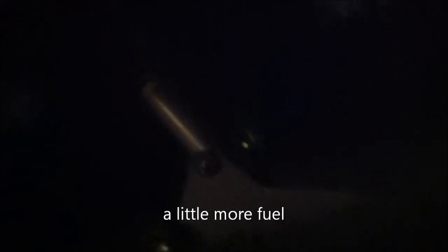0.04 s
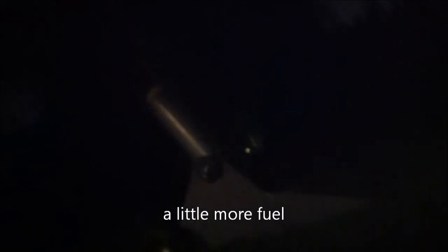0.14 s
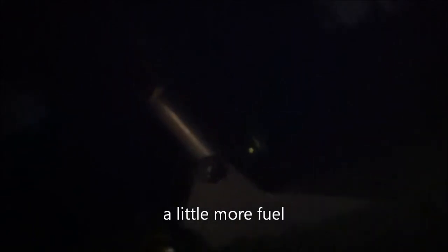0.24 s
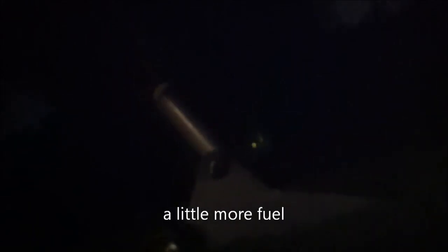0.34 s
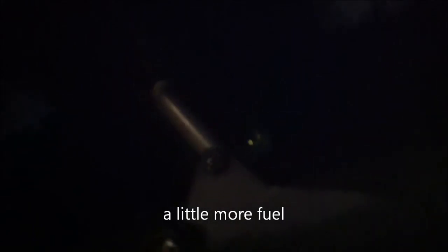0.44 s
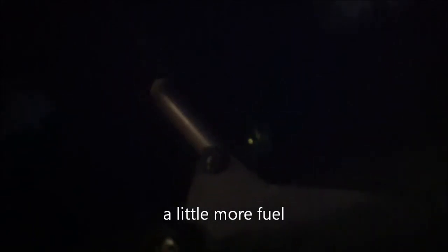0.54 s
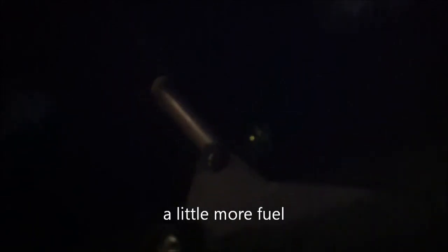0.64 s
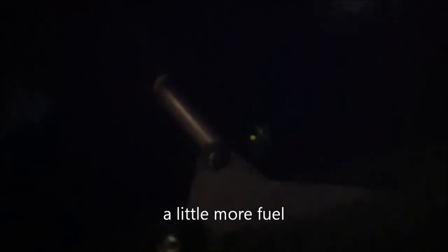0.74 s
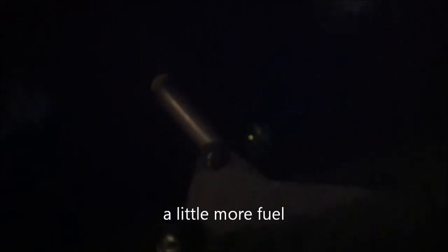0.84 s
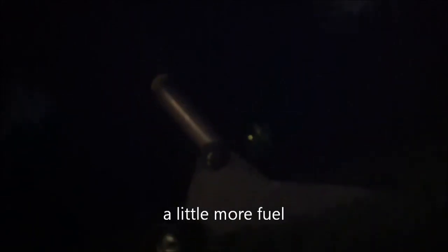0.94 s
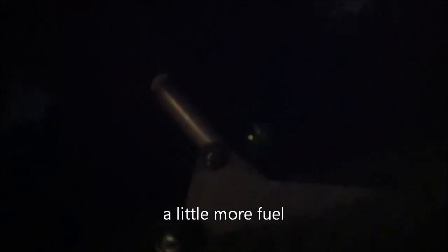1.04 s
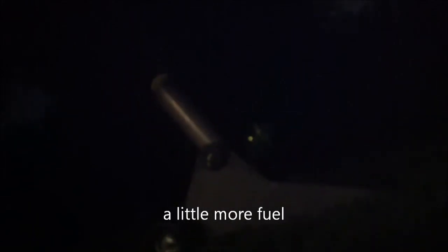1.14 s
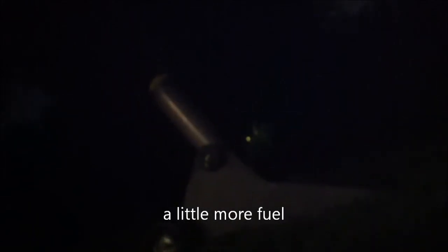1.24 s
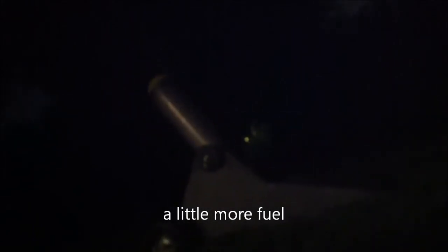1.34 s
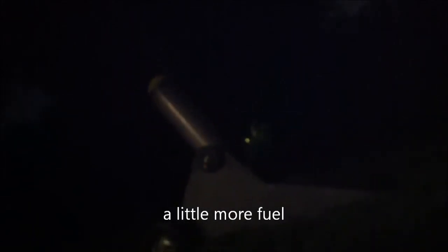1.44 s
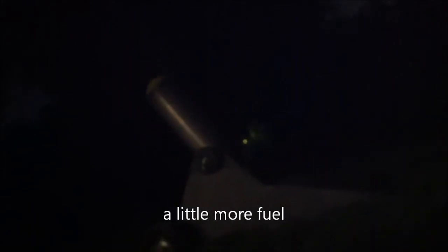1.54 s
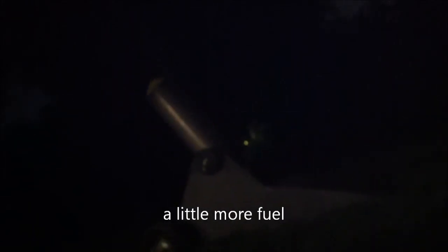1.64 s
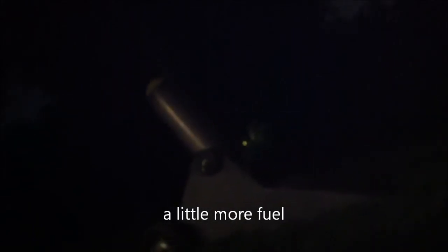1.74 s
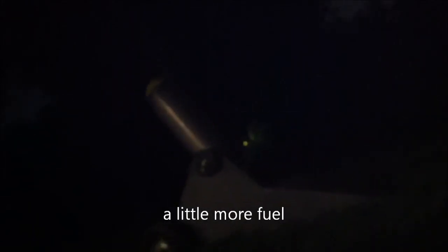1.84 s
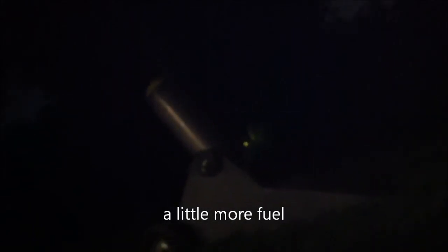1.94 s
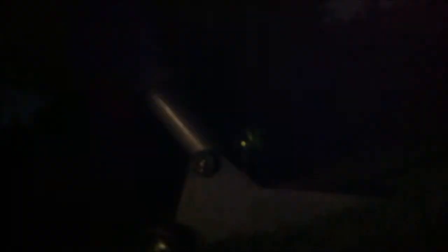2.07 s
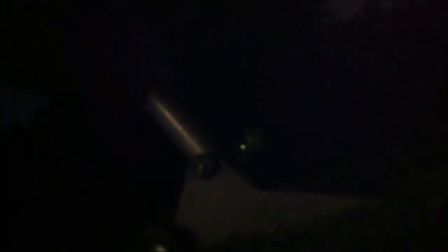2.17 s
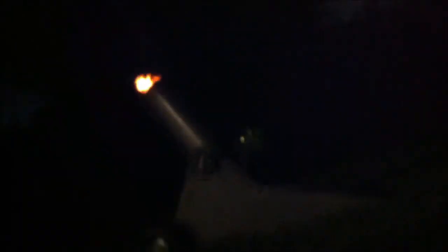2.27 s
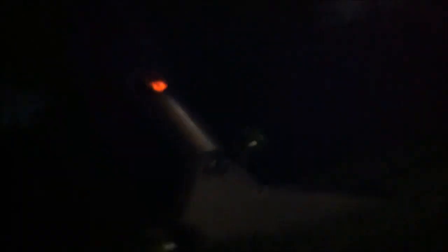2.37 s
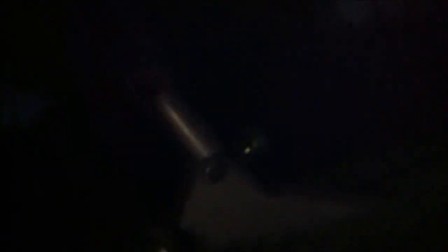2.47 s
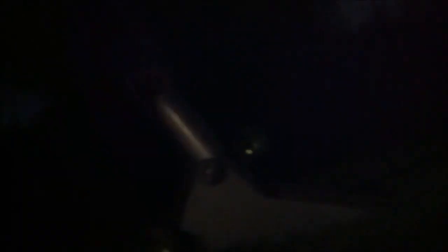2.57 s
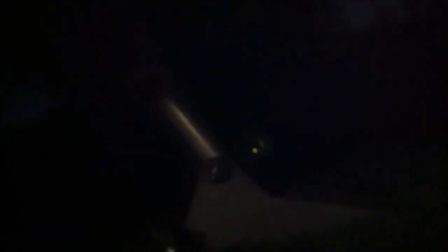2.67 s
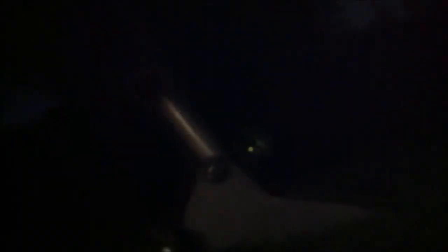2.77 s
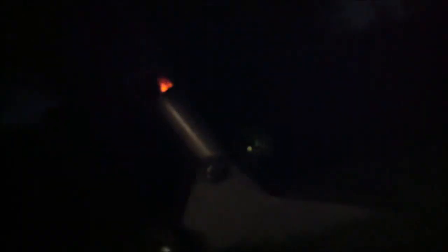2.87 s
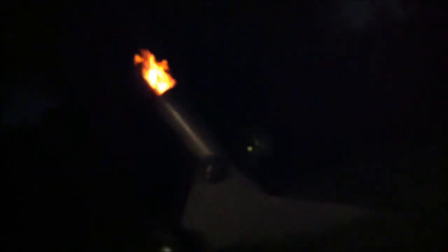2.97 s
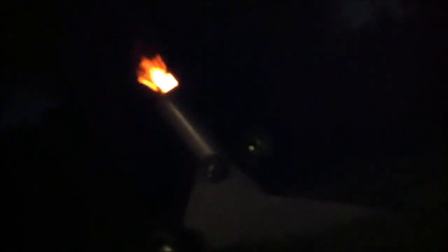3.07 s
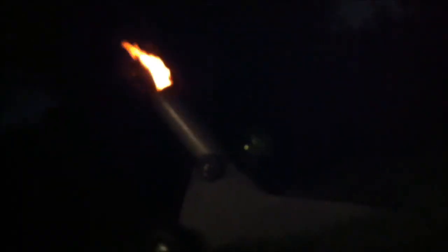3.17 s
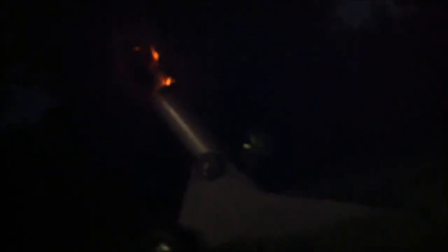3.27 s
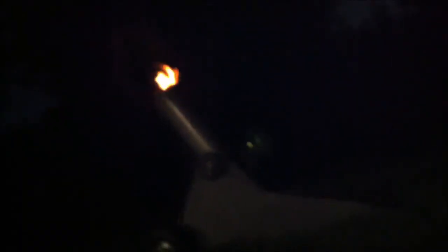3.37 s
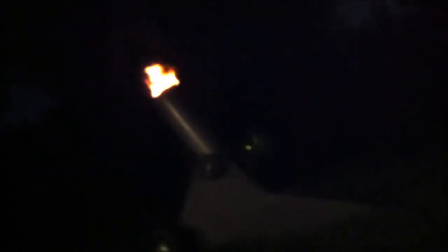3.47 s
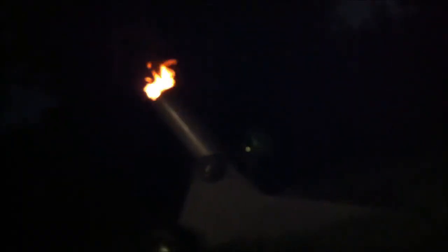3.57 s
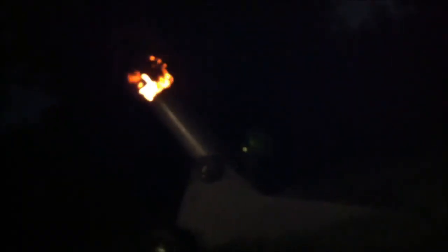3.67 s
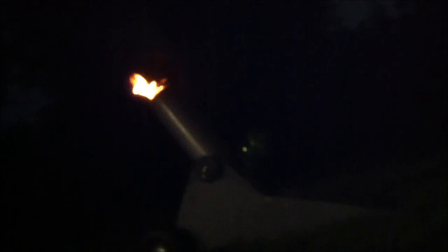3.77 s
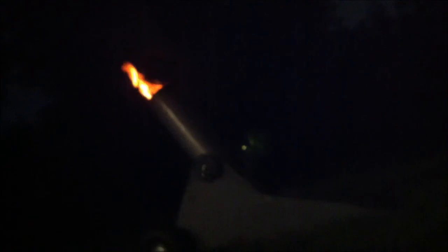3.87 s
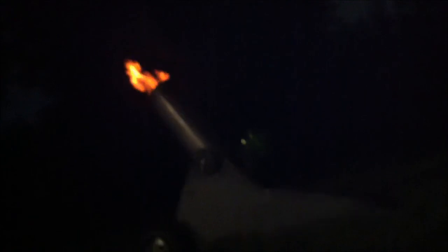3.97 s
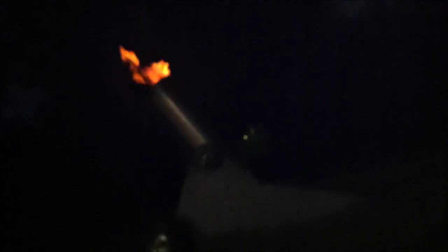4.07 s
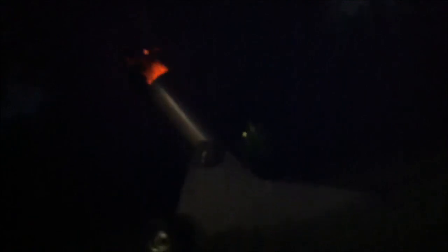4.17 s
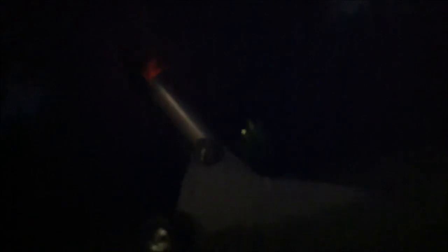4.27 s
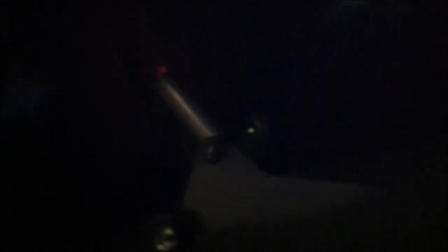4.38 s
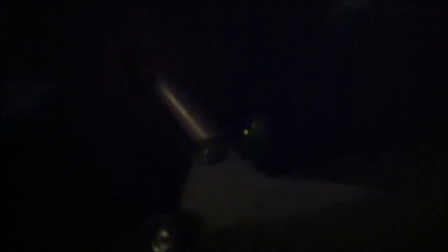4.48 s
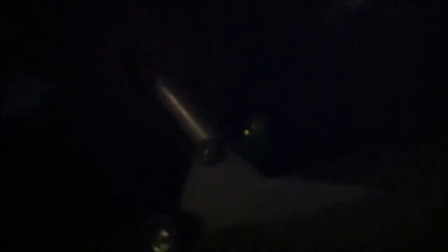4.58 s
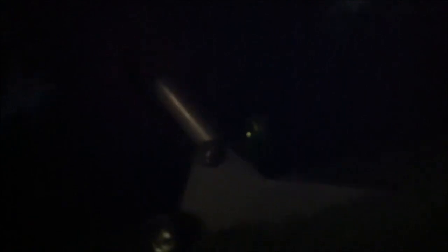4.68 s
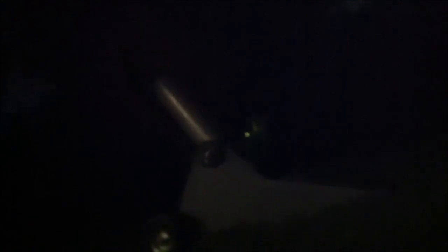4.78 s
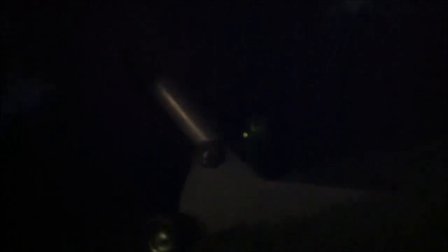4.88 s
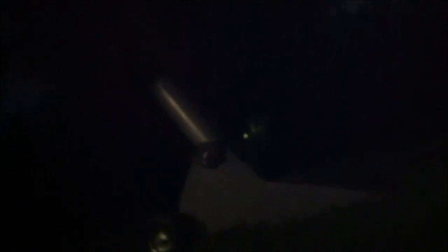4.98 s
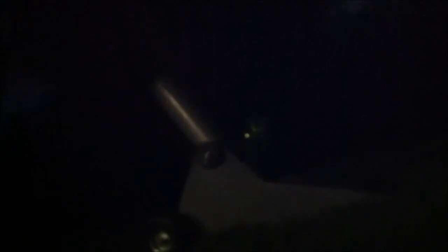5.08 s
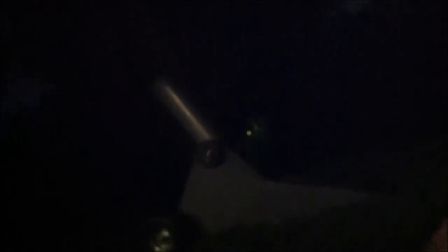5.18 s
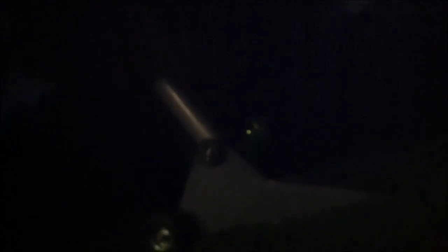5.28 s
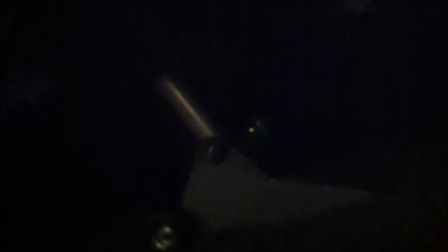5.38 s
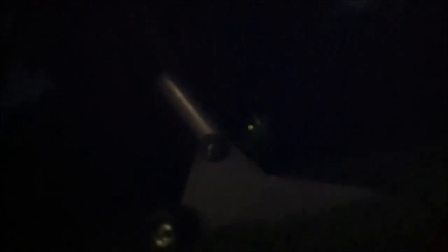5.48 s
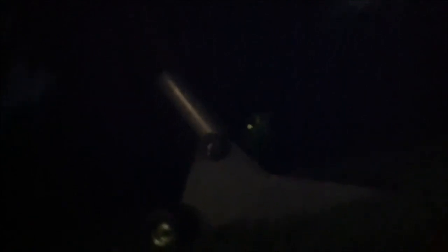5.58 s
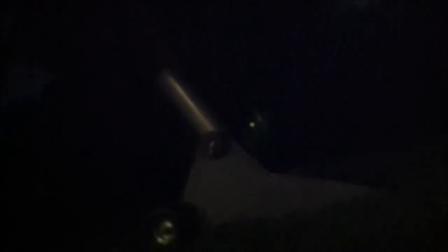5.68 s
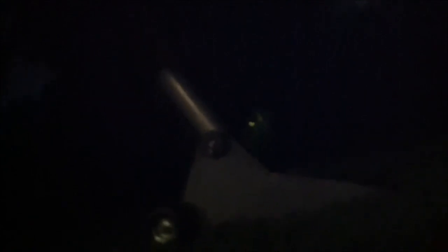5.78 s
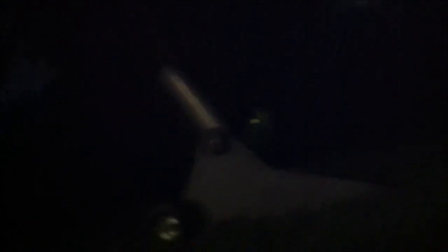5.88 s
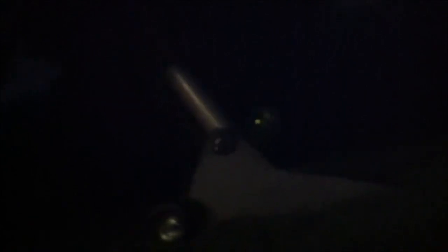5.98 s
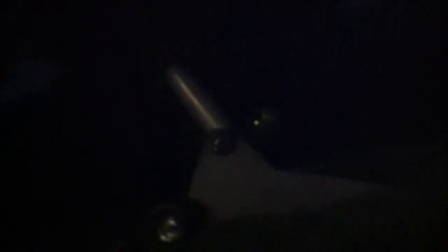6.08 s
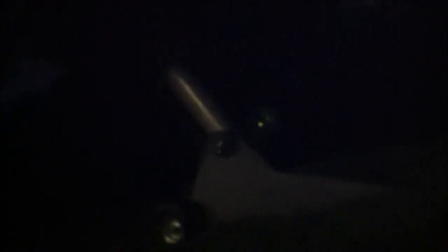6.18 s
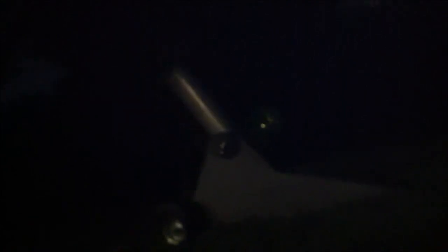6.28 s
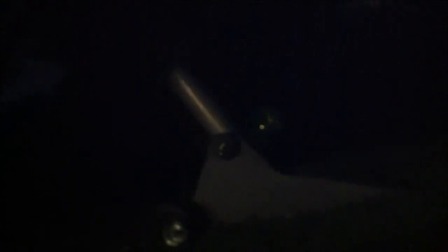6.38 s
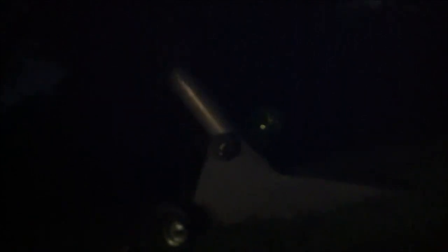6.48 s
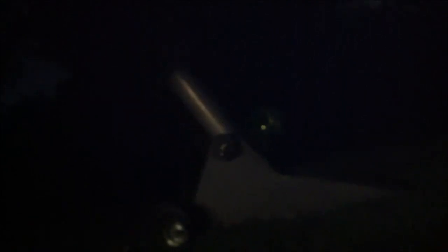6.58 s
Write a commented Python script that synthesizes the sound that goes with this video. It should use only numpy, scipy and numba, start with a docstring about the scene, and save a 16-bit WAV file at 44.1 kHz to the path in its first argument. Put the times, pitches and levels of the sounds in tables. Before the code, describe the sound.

A homemade gas cannon fires outdoors at night: igniter click, one overloaded boom, rolling echoes off trees, then insects slowly creep back.

```python
"""A snap, then a boom: a homemade gas cannon fires on a lawn at night. The igniter is a noise burst, the barrel a set
of decaying modes, the shock fronts filtered clicks; trees and houses return echo clicks and decaying noise.
Left-over gas burns softly at the muzzle and faint ticks and rustles follow, as flickering noise bands. Insects, noise
cut into wing strokes, shrill over a low distant hum. The camera's gain control ducks under the blast and lets the
night back in over several seconds."""
import sys
import numpy as np
from scipy import signal
from scipy.fft import rfft, irfft, next_fast_len
from scipy.io import wavfile
from numba import njit

SR = 44100
rng = np.random.default_rng(int(sys.argv[2]) if len(sys.argv) > 2 else 0)


def persist_wave(psi):
    """Save psi, clipped to +-1, as 16-bit WAV."""
    counts = np.round(np.clip(psi, -1, 1) * 32767).astype(np.int16)
    wavfile.write(sys.argv[1], SR, np.atleast_2d(counts).T)


N = 291940
TIME = np.arange(N) / SR
SPARK_S, BLAST_S = 2.0939, 2.1122


def blast(ring_peak_db=22, shock_db=15):
    """Pressure swells exponentially, then levels off, rings the barrel's air and throws out shock fronts."""
    # Air modes of the barrel. Each row: frequency in Hz, level in dB, t60 in seconds.
    barrel_modes = [(124, -18, 0.33), (177, -9, 0.18), (303, -3, 0.21), (360, -8, 0.23), (540, -19, .18),
                    (664, -16, 0.15), (844, -19, .13)]
    # Shock fronts leaving the muzzle. Each row: time in seconds, level in dB, treble edge in Hz.
    shock_fronts = [(2.1122, -21, 6970), (2.1139, -14.5, 10040), (2.1179, -11, 3500), (2.1266, -6.5, 3000),
                    (2.1467, 2.5, 2800)]
    # Colour of a shock front. Each row: frequency in Hz, level in dB.
    shock_outline = [(30, -33.5), (250, 0), (800, -1.5), (1800, -8.5), (4000, -24), (8000, -37.5),
                     (16000, -45.5)]
    swell_s, half_pressure_s = .0029, .0125
    age_s = TIME - BLAST_S
    pressure = .5 + .5 * np.tanh((age_s - half_pressure_s) / (2 * swell_s))
    modes = 0
    for hz, db, t60_s in barrel_modes:
        tone = np.cos(2 * np.pi * hz * (age_s - half_pressure_s))
        modes = modes + undb(db) * fade(SPARK_S, t60_s) * tone
    ring = pressure * modes
    ring = undb(ring_peak_db) * ring / np.abs(ring).max()
    fronts = sum(dull(clicks([(s, db)]), edge_hz) for s, db, edge_hz in shock_fronts)
    return ring + undb(shock_db) * colour(fronts, shock_outline)


def spark(crack_db=-12.0, crack_s=0.0014, ring_db=-25, ring_t60_s=.02):
    """The igniter: a millisecond of discharge and a short ring, both coloured noise."""
    # Colour of the snap. Each row: frequency in Hz, level in dB.
    snap_outline = [(300, -32), (1360, -12.5), (2400, -21), (3100, -2), (3900, -2.5), (5800, -20),
                    (7570, -6), (10000, -5.5), (12700, -6.5), (14000, 5), (16000, -11.5)]
    discharge = (TIME >= SPARK_S) * (TIME < SPARK_S + crack_s)
    envelope = undb(crack_db) * discharge + undb(ring_db) * fade(SPARK_S, ring_t60_s)
    return level(colour(noise(), snap_outline), 0) * envelope


def surroundings(echo_db=20, lumpy_db=1.5, rumble_db=5.6, foliage_db=6.5):
    """Big surfaces return thuds and a dull roll; foliage scatters a brighter roar that dies with path length."""
    # Echoes from houses and tree lines. Each row: time in seconds, level in dB relative to the roll then.
    distinct_echoes = [(2.147, -6), (2.216, -2), (2.243, -0.5), (2.316, 0), (2.403, -3.5), (2.456, -6),
                       (2.541, -1), (2.739, -4.5), (3.51, 3)]
    # Colour of the echoes. Each row: frequency in Hz, level in dB.
    echo_outline = [(25, -39), (50, -35), (80, -18.5), (125, -4), (160, 2), (210, 1), (260, -8.5),
                    (320, -7), (500, -24), (1000, -45.5), (4000, -71.5)]
    # Colour of the roar scattered by foliage. Each row: frequency in Hz, level in dB.
    scatter_outline = [(100, -23.5), (220, -6.5), (305, 5), (420, -3.5), (650, -8.5), (1000, -21.5),
                       (1900, -22.5), (2600, -30.5), (4200, -35.5), (5000, -41), (9000, -46.5),
                       (16000, -50)]
    strength = roll()
    returns = (clicks(distinct_echoes) + small_echoes()) * strength
    thuds = undb(echo_db) * colour(returns, echo_outline)
    rumble = level(colour(noise(), echo_outline), rumble_db)
    roar = air(level(colour(noise(), scatter_outline), foliage_db))
    uneven = strength * undb(lumpy_db * walk(70))
    return dull(thuds + rumble * uneven, 1500) + roar * uneven


def roll(attack_s=.014, hold_s=0.21, db_per_doubling=22.5, order=4):
    """Returning strength: quick rise, hold across the nearby trees, then a fixed loss per doubled travel time."""
    age_s = np.maximum(TIME - BLAST_S, 0)
    rise = np.minimum(age_s / attack_s, 1) ** 2
    # order sets how sharply the hold bends into the loss
    doublings = np.log2(1 + (age_s / hold_s) ** order) / order
    return rise * undb(-db_per_doubling * doublings)


def small_echoes(first_s=.13, last_s=.8, db=-11, scatter_db=2, count=20):
    """Lesser surfaces at random distances, one in each equal step of delay."""
    place, size = rng.random((count, 2)).T
    delay_s = first_s + (last_s - first_s) * (np.arange(count) + place) / count
    echo_db = db + scatter_db * (2 * size - 1)
    return clicks(np.column_stack([BLAST_S + delay_s, echo_db]))


def air(x, db_per_s=29, db_per_s_per_khz=2.7, size=512):
    """The longer the sound has travelled, the more it has lost, treble most."""
    hz, s, frames = signal.stft(x, SR, nperseg=size)
    rate_db_per_s = db_per_s + db_per_s_per_khz * hz / 1000
    loss_db = np.outer(rate_db_per_s, np.maximum(s - BLAST_S, 0))
    return signal.istft(frames * undb(-loss_db), SR)[1][:N]


def flame(middle_s=4.05, spread_s=0.19, db=-68.0, flicker_db=3, width_hz=330):
    """Left-over gas burns at the muzzle: a thin, flickering noise band that swells and fades."""
    whisper = level(band(noise(), 3160, width_hz), db)
    return whisper * swell(middle_s, spread_s) * undb(flicker_db * walk(12))


def ticks(t60_s=0.028):
    """Tiny high ticks after the shot: decaying noise bands."""
    # Each row: start in seconds, centre in Hz, level in dB.
    tick_rows = [(2.5, 10300, -42.5), (4.064, 12980, -54)]
    return sum(level(band(noise(), hz, 3500), db) * fade(s, t60_s) for s, hz, db in tick_rows)


def rustles(grain_db=2.2, grain_hz=110):
    """Soft, grainy noise bands close to the microphone swell and fade once the boom has gone."""
    # Each row: middle in seconds, spread in seconds, centre in Hz, width in Hz, level in dB.
    rustle_rows = [(5.18, .045, 10000, 7000, -65), (5.4, 0.23, 9500, 11000, -67),
                   (5.19, 0.045, 2900, 3500, -76), (5.52, 0.14, 3200, 4000, -67),
                   (5.46, 0.24, 380, 450, -61.5), (5.91, 0.025, 830, 260, -61),
                   (5.92, .03, 3000, 2000, -70.5)]
    swells = 0
    for middle_s, spread_s, hz, width_hz, db in rustle_rows:
        swells = swells + level(band(noise(), hz, width_hz), db) * swell(middle_s, spread_s)
    return swells * undb(grain_db * walk(grain_hz))


def insects(db=-46.5, base_stroke_hz=60, shimmer_db=1.02, count=16):
    """Each insect rasps in quick wing strokes at its own pace; they merge into a shrill band and faint overtone."""
    # Wing resonances. Each row: frequency in Hz, level in dB.
    wing_outline = [(5500, -55), (6400, -33), (7020, -16), (7200, -7.5), (7400, -5), (7700, -0.5),
                    (8000, 0), (8200, -10.5), (8450, -26), (8800, -35.5), (11000, -54.5), (14000, -51),
                    (14700, -36.5), (15800, -33.5)]
    chorus = 0
    for pace in rng.uniform(.5, 2, count):
        strokes = np.cumsum(base_stroke_hz * pace * (1 + 0.053 * walk(7.2))) / SR
        rasp = noise() * np.sin(np.pi * strokes) ** 2
        chorus = chorus + rasp * undb(2 * walk(10.0))
    return level(colour(chorus, wing_outline), db) * undb(shimmer_db * walk(15))


def night(db=-57.0):
    """Steady distant hum of traffic and machines, with some hiss: coloured noise."""
    # Each row: frequency in Hz, relative level in dB per Hz.
    night_outline = [(25, -31), (50, -24.5), (80, -19), (125, -4.5), (185, 1.5), (270, -5), (330, -5),
                     (450, -14.5), (800, -22.5), (1700, -24.5), (2500, -29.5), (3600, -28), (6000, -33.5),
                     (12000, -40.5), (16000, -38)]
    return level(colour(noise(), night_outline), db)


def undb(db):
    """Decibels to gain."""
    return 10 ** (np.asarray(db) / 20)


def level(x, db):
    """Scale to an rms level."""
    return x * undb(db) / np.sqrt(np.mean(x ** 2))


def colour(x, points):
    """Causal minimum-phase filter with the given (Hz, dB) outline; a unit click comes out with peak 1."""
    hz, db = np.transpose(points)
    size = 2 * next_fast_len(N)
    bins_hz = np.maximum(np.arange(size // 2 + 1) * SR / size, 1)
    outline_db = np.interp(np.log(bins_hz), np.log(hz), db)
    # folding the cepstrum onto positive times makes the filter causal
    cepstrum = irfft(np.log(undb(outline_db)))
    cepstrum[1:size // 2] *= 2
    cepstrum[size // 2 + 1:] = 0
    response = np.exp(rfft(cepstrum))
    peak = np.abs(irfft(response)).max()
    return irfft(rfft(x, size) * response / peak)[:N]


def band(x, hz, width_hz):
    """A resonance applied twice; the width is that of one pass."""
    b, a = signal.iirpeak(hz, hz / width_hz, fs=SR)
    return signal.lfilter(b, a, signal.lfilter(b, a, x))


def dull(x, edge_hz):
    """Treble lost above an edge."""
    return signal.sosfilt(signal.butter(2, edge_hz, fs=SR, output="sos"), x)


def fade(start_s, t60_s):
    """Silence until start, then an exponential decay."""
    return (TIME >= start_s) * np.exp(-np.log(1000) * np.maximum(TIME - start_s, 0) / t60_s)


def swell(middle_s, spread_s):
    """Bell-shaped rise and fall with peak 1."""
    return np.exp(-.5 * ((TIME - middle_s) / spread_s) ** 2)


def clicks(rows):
    """One impulse for each (s, dB) row."""
    s, db = np.transpose(rows)
    return np.bincount(np.round(s * SR).astype(int), undb(db), N)


def noise():
    """White noise."""
    return rng.standard_normal(N)


def walk(knots_per_s):
    """Random wander: straight lines between normal random knots."""
    knots = rng.standard_normal(2048)
    return np.interp(TIME * knots_per_s, np.arange(len(knots)), knots)


def scene():
    """Everything that reaches the microphone."""
    shot = spark() + blast() + surroundings()
    aftermath = flame() + ticks() + rustles()
    return (shot + aftermath + insects() + night())[None]


@njit
def gain_control(x, top, attack_s, hold_s, release_s):
    """Gain drops quickly on overload, holds, then creeps back ever more slowly."""
    y, gain, wait_s = np.empty(len(x)), 1., 0.
    for i in range(len(x)):
        out = abs(x[i]) * gain
        if out > top:
            gain -= gain * (1 - top / out) / (attack_s * SR)
            if wait_s <= 0:
                wait_s = hold_s
        elif wait_s <= 0:
            gain += (1 - gain) ** 2 / (release_s * SR)
        wait_s -= 1 / SR
        y[i] = x[i] * gain
    return y


def record(dry, hiss_db=-65):
    """The camera ducks its gain, flattens peaks that slip through, adds its own noise and cuts both ends."""
    # The camera's own noise. Each row: frequency in Hz, relative level in dB per Hz.
    hiss_outline = [(25, -25), (60, -17), (110, -3), (170, 1), (400, -7), (800, -12.5), (1700, -14.5),
                    (2600, -21.5), (6000, -25), (10000, -29), (16000, -32.5)]
    ceiling, attack_s, hold_s, release_s = .5, .0004, .24, 1.45
    low_cut_hz, top_hz = 40, 15750
    ducked = gain_control(dry[0], ceiling, attack_s, hold_s, release_s)
    clipped = ducked / (1 + (ducked / ceiling) ** 12) ** (1 / 12)
    lean = signal.sosfilt(signal.butter(1, low_cut_hz, "high", fs=SR, output="sos"), clipped)
    noisy = lean + level(colour(noise(), hiss_outline), hiss_db)
    return signal.sosfilt(signal.ellip(8, .2, 70, top_hz, fs=SR, output="sos"), noisy)[None]


dry = scene()
out = record(dry)
persist_wave(out)
```